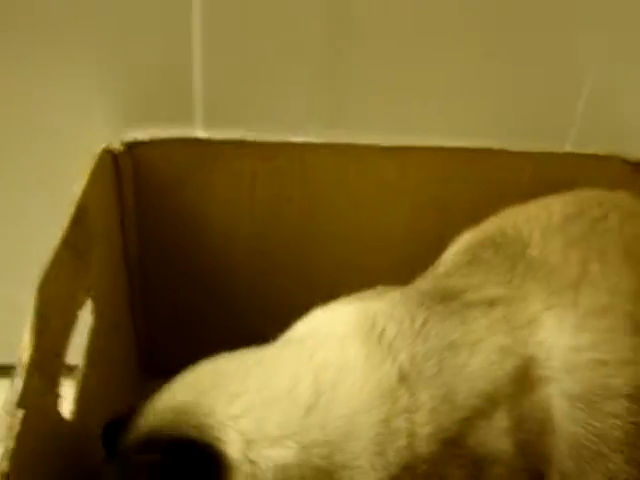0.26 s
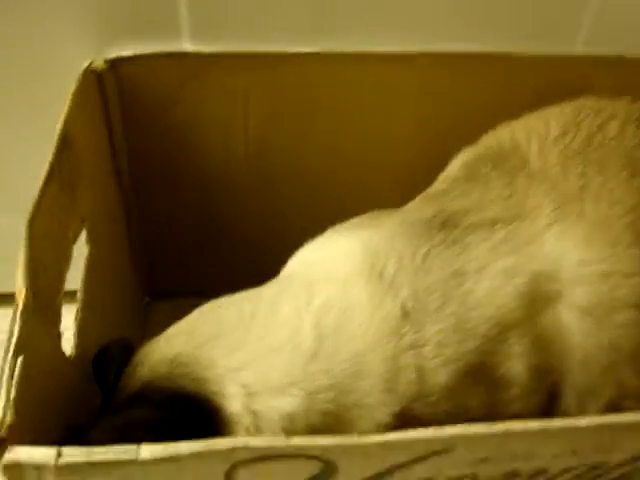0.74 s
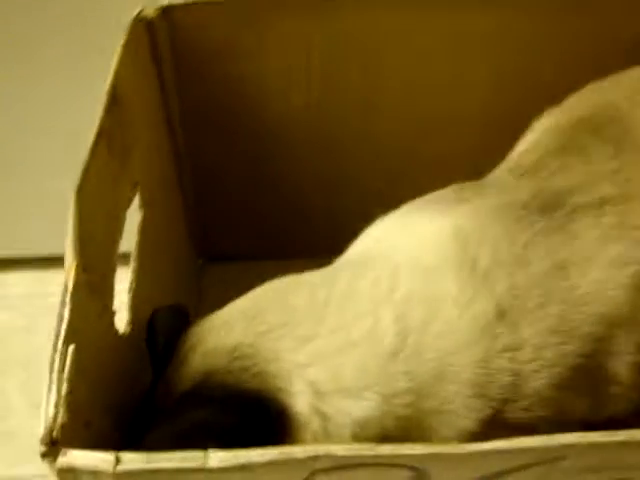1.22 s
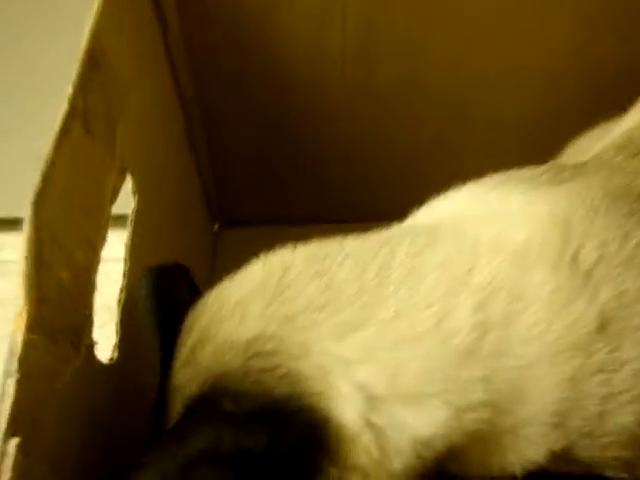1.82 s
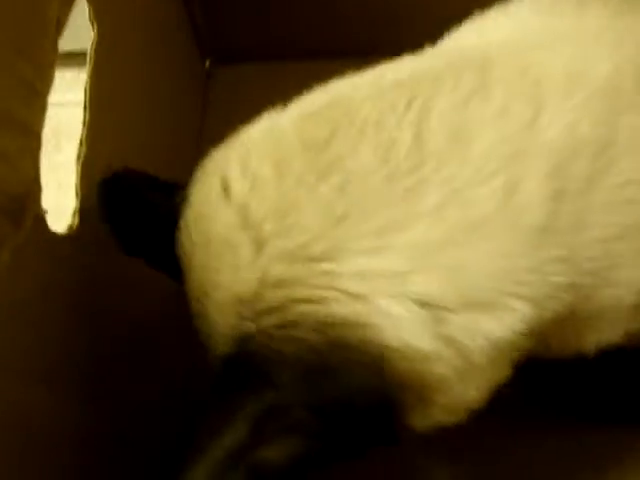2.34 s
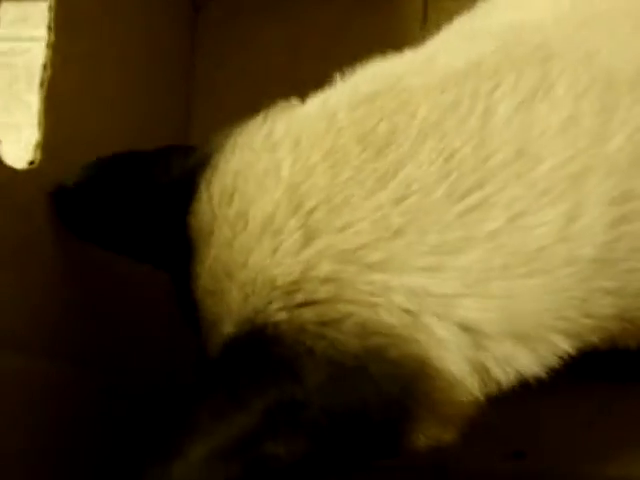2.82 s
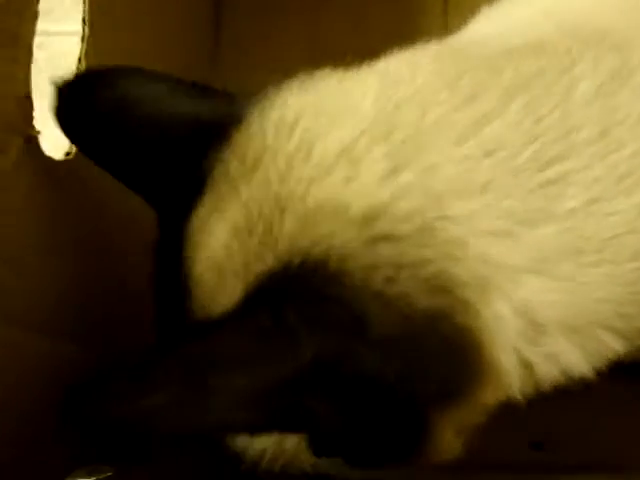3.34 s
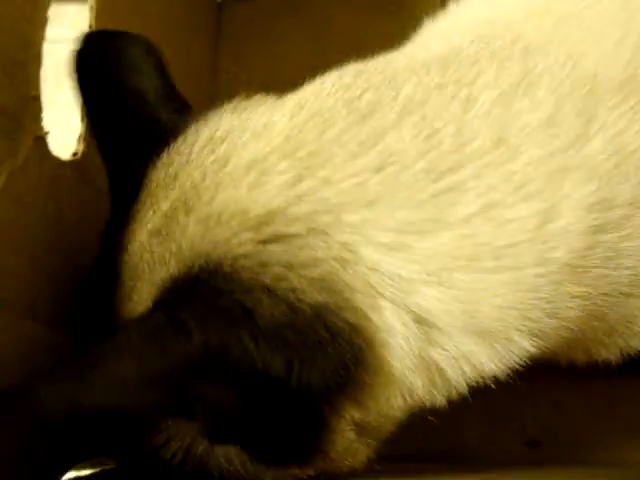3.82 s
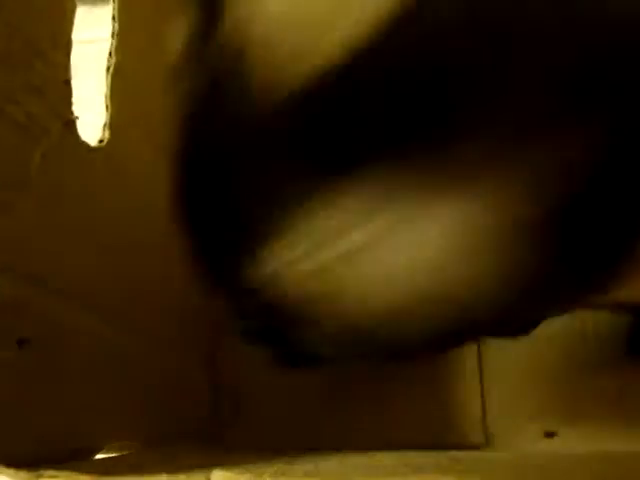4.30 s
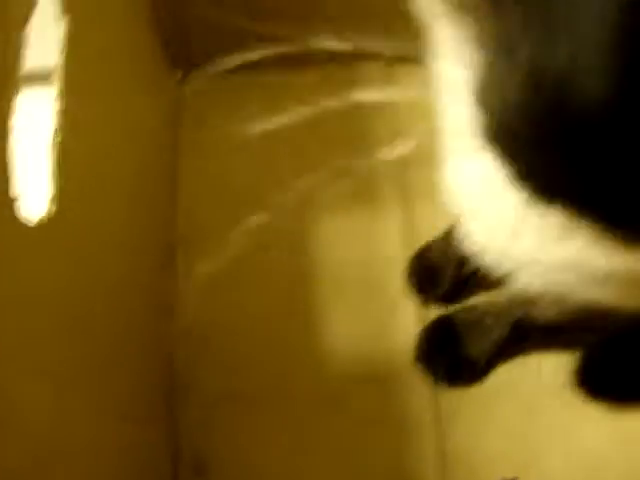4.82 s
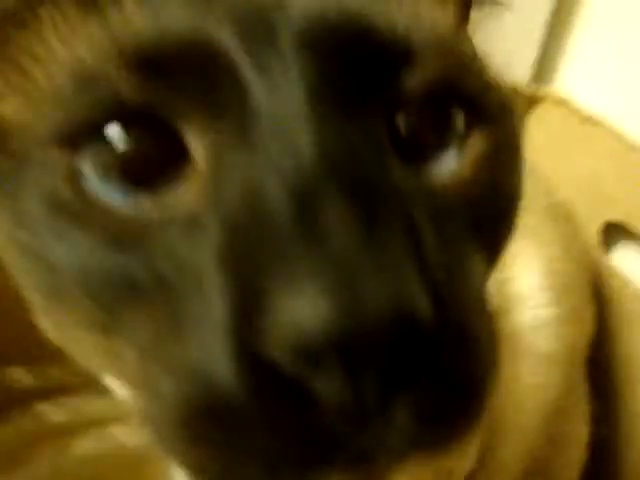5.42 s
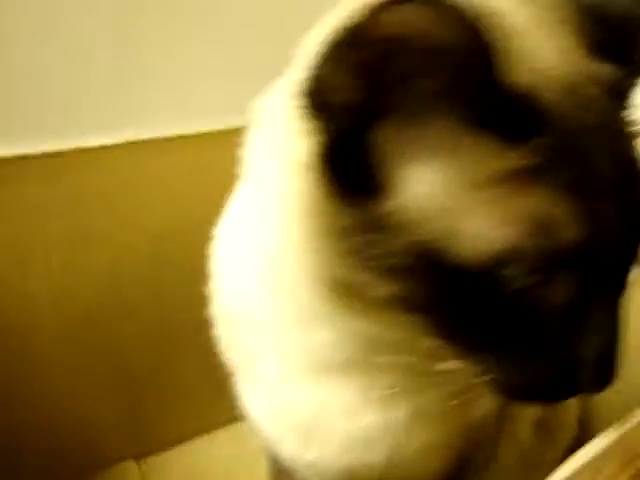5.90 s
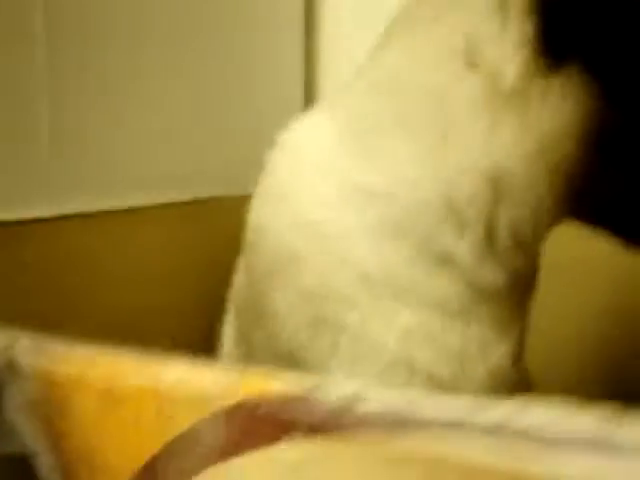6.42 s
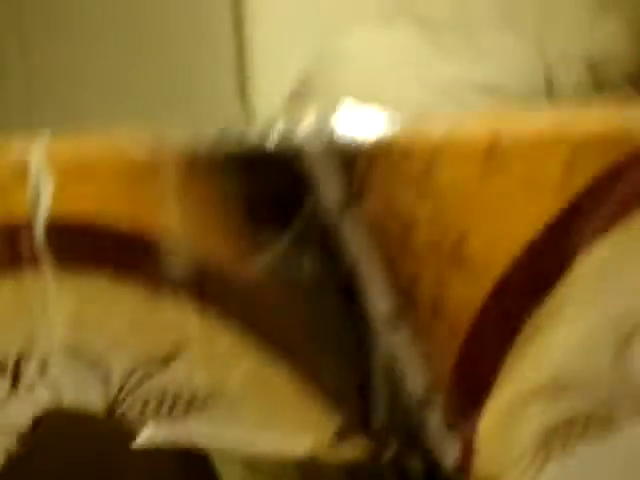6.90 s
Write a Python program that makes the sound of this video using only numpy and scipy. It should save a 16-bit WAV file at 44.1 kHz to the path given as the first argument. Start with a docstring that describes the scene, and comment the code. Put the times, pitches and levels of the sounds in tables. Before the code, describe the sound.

A fan motor hums faintly in a room while a cat claws at a cardboard box in quick, uneven strokes, with dry tearing, snaps and hollow bumps close to the microphone. The cat scratches for about three seconds, pauses, then digs again briefly. Near the end come irregular plastic clicks from the hand-held camera, the hardest with a low knock, and a light rub of fingers.

```python
"""A cat rakes the floor of a cardboard box, close to a small hand-held camera; a fan motor hums throughout.
0.15 s: the camera's plastic shell ticks once. 0.2-3 s: claws catch, slip, snag and squeak on the fibres and
ring the box. 3.5-4.3 s: a second bout of digging, in which the box's low rocking sounds louder. From 5.2 s: the
shell ticks, the hardest ticks knock against the hand, and from 6 s fingers rub the plastic."""
import sys
import numpy as np
from scipy import signal
from scipy.fft import rfft, irfft
from scipy.io import wavfile
from scipy.ndimage import uniform_filter1d

SR = 44100
rng = np.random.default_rng(int(sys.argv[2]) if len(sys.argv) > 2 else 0)


def transcribe(u):
    """Save the signal u as a 16-bit wav file named by the first command-line argument.

    u: samples, shape (n,) or (channels, n), limited to [-1, 1]; the rate is SR.
    q: integer samples, one column per channel.
    """
    v = np.clip(np.atleast_2d(u).T, -1, 1)
    q = np.round(v * 32767).astype(np.int16)
    wavfile.write(sys.argv[1], SR, q)


N = 315437

# claw strokes: peak_s, rise_ms, fall_ms, force_db, weight_re_force_db, tear_re_force_db
STROKES = [(0.233, 2.8, 9.3, -25.5, 5, -23), (0.323, 13, 8.8, -32, -3.5, -8), (0.391, 3.7, 14, -38, -10, 3),
           (0.409, 9.5, 2.8, -30, -3, -5), (0.502, 23, 6.8, -38, 6, 4.5), (0.523, 9.5, 14, -28, 1, -10),
           (0.62, 2.6, 7.5, -30.5, 2.5, -3.5), (0.67, 27, 20, -33.5, -6, -12),
           (0.811, 51, 8, -33, -8.5, -7), (0.892, 18, 17, -46, 8.5, 3), (0.954, 13.4, 7.4, -22, 0.5, -10),
           (0.964, 12, 15, -21.5, -5.5, -44), (1.044, 53, 2.6, -38, 1, -12), (1.078, 3.7, 9, -34, 8, 2.5),
           (1.142, 36, 15, -36.5, 0.5, -7.5), (1.256, 25, 13, -41, -25, 2.5),
           (1.307, 26, 110, -48, 0.5, -5.5), (1.385, 4.5, 4.6, -35, -14, -26),
           (1.406, 27.7, 7.9, -21.5, -1.5, -9), (1.424, 7.2, 13, -46.5, 16, -24),
           (1.461, 17, 48, -36, 4, -6), (1.531, 7.6, 31, -35, -4, -9), (1.648, 24, 5, -32, -9, -5.5),
           (1.758, 71, 36, -41, -3.5, -6.5), (1.841, 16, 10, -34, 9.5, -17),
           (1.856, 13, 16, -26.5, 0.5, -6.5), (1.973, 52, 23, -26.5, -1, -13),
           (2.098, 9.3, 12, -35.5, -25, -6), (2.244, 19, 12, -38.5, -6, -11.5),
           (2.27, 10, 4.9, -36.5, -8, -11), (2.324, 6.2, 24, -33, -13, -23),
           (2.36, 7.3, 14, -31.5, -3, -12), (2.385, 17, 22, -20.5, -9.5, -15.5),
           (2.418, 16, 12.4, -25, -13, -13), (2.498, 18, 3.9, -27, -10, -14),
           (2.628, 15, 57, -28, -14, -15), (2.702, 28, 60, -25, -11, -15),
           (2.731, 9.1, 20, -25, -10.5, -7.5), (2.837, 36, 66, -35, -23, -11),
           (3.009, 13, 40, -40, -9, -6.5), (3.484, 5.5, 19, -29.5, -2, -3), (3.533, 5.4, 3, -15, -11.5, -7),
           (3.6, 14, 52, -48, -17, 3), (3.65, 17, 13, -35, -11, -2.5), (3.666, 12, 9.7, -37, 4, -16),
           (3.685, 18, 20, -46, 5, 1), (3.716, 6.4, 12, -24, 2, -5.5), (3.735, 8, 8.6, -41, 15, -26),
           (3.8, 1.5, 14, -31, -2.5, -2.5), (3.825, 9, 1.8, -28, 0, 0.5),
           (3.844, 5.6, 2.7, -31.5, 4.5, -22), (3.883, 18, 9.3, -42.5, 7, 1),
           (3.906, 14.6, 12, -32, -5.5, -6.5), (4.027, 34, 8.8, -40, -2, -4.5),
           (4.061, 13, 64, -40.5, 2.5, -6), (4.154, 9.6, 11, -28.5, -7, -4), (4.178, 11, 16, -35.5, -2, -5),
           (4.23, 69, 2.2, -43.5, 4, -2)]
# soft paw drag: time_s, level_db, grit_re_level_db
PAW_DRAG = [(0.15, -79, -12), (0.27, -42, -20), (0.54, -36.5, -15), (0.72, -49.5, -8.5), (0.86, -38, -18),
            (1.0, -46.5, -24), (1.3, -37.5, -11.5), (1.65, -54.5, -13), (1.9, -45, -8.5),
            (2.17, -45.5, -12.5), (2.45, -42.5, -13.5), (2.58, -44, -15), (3.01, -55.5, -7.5),
            (3.42, -76, -25), (3.54, -41.5, -16), (3.72, -37, -9), (3.87, -44, -20), (3.97, -60, -17),
            (4.05, -46.5, -9.5), (4.23, -48, -7), (4.3, -63, -15), (4.45, -72, -15)]
# a claw hooks and snaps free: start_s, level_db, knock_re_level_db
SNAGS = [(0.23, -23.5, 7.5), (0.313, -31, -4), (0.496, -21, -11), (0.52, -22, -7), (0.618, -26.5, 8),
         (0.655, -30, 2), (0.948, -36, 10), (0.962, -24, 7), (1.077, -21.5, -7.5), (1.125, -23.5, 7),
         (1.162, -32, -6), (1.384, -29, 14), (1.401, -19, 1), (1.528, -29, 14), (1.651, -36, 6),
         (1.831, -26, 5), (1.949, -27, -3), (1.965, -29, 10), (2.322, -31, -3), (2.378, -19.5, 0),
         (2.395, -28, -3), (2.626, -23.5, -18), (2.726, -15, -4), (3.478, -30.5, 18), (3.531, -20, 10),
         (3.577, -37, 1), (3.713, -30, 2), (3.726, -29, 12), (3.805, -33, 15), (3.842, -22.5, 6),
         (3.88, -29, -5), (3.902, -24, 12), (3.97, -35.5, 2), (4.149, -33.5, 18.5), (4.226, -34, -6)]
# claw tip squeaks: start_s, pitch_hz, peak_db
SQUEAKS = [(0.778, 2800, -27.5), (0.952, 3600, -24.5), (1.159, 4640, -31.5), (1.833, 4000, -35),
           (1.854, 3860, -27), (1.937, 5500, -38), (3.478, 1650, -26.5), (3.501, 2350, -39)]
# box resonances: centre_hz, width_hz, relative_db
WALL_MODES = [(251.5, 54, 1), (343, 46, 3.5), (463, 59.5, 2), (575, 61, 7.5), (613.6, 77, 7.5),
              (652, 120, 4)]
ROCKING_MODES = [(106, 12, -1), (135, 15, -11.5), (182, 41, -2), (273, 18, 0)]
FLOOR_MODES = [(880, 124, 6.5), (973, 365, -0.5), (1333, 330, 0.5), (1557, 280, -2.5), (2010, 154, -7.5)]
OPEN_FLOOR_MODES = [(1002, 60, 1.5), (1056, 76, 1.5), (1154, 135, -10)]
TEAR_MODES = [(1813, 260, 2), (2350, 650, -1), (3074, 1200, -2), (3910, 640, 0), (4560, 590, -4.5),
              (5360, 570, -4), (6380, 1100, -5.5), (7690, 940, -6), (9020, 1500, -9)]
GRIT_MODES = [(2070, 560, -0.5), (2800, 1330, 1.5), (3950, 1500, -1.5), (5300, 960, -6),
              (7600, 2500, -11.5)]  # loose fibres under the paw
# narrow ring, stronger with the paw on the open floor: time_s, gain_db
OPEN_FLOOR_GAIN = [(0.2, -18), (0.9, -27), (1.1, -5.5), (1.4, -1.5), (1.7, 1), (2.0, -2.5), (2.3, -8.5),
                   (2.55, 0), (2.7, -21), (2.9, -8.5), (3.48, -12), (3.6, -4), (3.67, 10), (3.72, -9),
                   (3.75, 6), (3.82, -6), (3.9, 2), (4.05, 4.5), (4.22, 3)]

# shell ticks: start_s, mid_db, low_re_mid_db, body_re_mid_db, high_re_mid_db, decay_ms
SHELL_TICKS = [(0.1543, -26, -25, -24, -8.5, 2.9), (5.2302, -30, -7, -22, -25, 2.3),
               (5.455, -12.5, -14, -12, -28, 7.5), (5.52, -28, -12, -20, -25, 2.5),
               (5.919, -36, -18, -20, -22, 2.5), (5.967, -29, -19, -19, -24, 2.3),
               (6.0998, -29.5, 1, 11.5, -35, 6.7), (6.4385, -9.5, -1, -19, -13.5, 4.6),
               (6.559, -17.5, -1, -26, -2.5, 4.3), (6.6278, -26.5, 13.5, 9.5, -12, 2.3),
               (6.7352, -12.5, -2.5, -23, -11, 1.8), (6.7381, -4, -6, -7.5, -18, 2.4),
               (6.7634, -31, -4, -17, -20, 3)]
# fingers sliding on the shell: peak_s, rise_ms, fall_ms, level_db, treble_db
FINGER_RUBS = [(0.185, 10, 12, -56, -64), (6.0, 34, 31, -50, -66), (6.88, 31, 34, -58.5, -62),
               (7.08, 98, 110, -56, -57.5)]
# shell resonances: centre_hz, width_hz, relative_db
SHELL_LOW_MODES = [(1000, 110, 7.5), (1510, 500, 11.5), (1240, 630, 7), (475, 420, 1)]
SHELL_BODY_MODES = [(2070, 390, 0)]
SHELL_MID_MODES = [(2630, 380, 16), (3100, 400, -27), (2350, 230, 9.5)]
SHELL_HIGH_MODES = [(3700, 700, -2), (4600, 900, 0), (6000, 2000, -5), (8300, 2500, -7)]

# fan rush spectrum: frequency_hz, relative_density_db
FAN_SPECTRUM = [(20, -54), (45, -39), (100, -23.5), (170, -7.5), (260, -7.5), (330, -11), (450, -9),
                (650, -6), (950, -8), (1400, -15.5), (2500, -20.5), (5000, -26), (10300, -31)]
# resonances in the rush: centre_hz, width_hz, relative_db
FAN_MODES = [(414, 82, -6.5), (962, 74, -11), (3370, 26, -19), (4320, 85, -37)]
# mains and motor lines: pitch_hz, level_db
HUM_LINES = [(50, -75.5), (57, -76), (121, -83.5), (138, -92), (210, -54.5), (240, -65.5), (291, -66.5)]


def claws():
    """Stick-slip on cardboard: coarse catches shake the panels, dense tearing rasps."""
    walls, floor, rasp, rocking = stroke_pressures()
    drag_db, grit_re_drag_db = curves(PAW_DRAG)
    grit_db = drag_db + grit_re_drag_db
    drag_db = drag_db + 2 * walk(rate_hz=29.36)
    grit_db = grit_db + 2 * walk(rate_hz=29.36)
    catches, tearing = fibre_friction()
    grit = undb(grit_db + 3 * walk(rate_hz=60)) * (.8 * tearing + .6 * slips(per_s=500, spread_db=3))
    hook, knock, snap = snags()
    wall_force = (walls + undb(drag_db - 3)) * catches
    floor_pressure = floor + undb(drag_db)
    floor_force = floor_pressure * (.35 * catches + .48 * tearing) + hook
    open_floor_force = undb(curves(OPEN_FLOOR_GAIN)[0]) * (.5 * floor_pressure * catches + hook)
    # the moving paw favours each mode in turn
    out = ring(wall_force, WALL_MODES, wander_db=2, rate_hz=20)
    out += ring(knock, WALL_MODES, order=1)
    out += ring(rocking * catches, ROCKING_MODES)
    out += ring(floor_force, FLOOR_MODES, wander_db=2.2, rate_hz=28)
    out += ring(open_floor_force, OPEN_FLOOR_MODES, wander_db=4, rate_hz=22)
    out += ring(rasp * tearing + snap, TEAR_MODES, wander_db=3, rate_hz=70)
    return out + ring(grit, GRIT_MODES, wander_db=3, rate_hz=50)


def stroke_pressures(second_bout_s=3.3, second_bout_db=3.5):
    """Wall, floor, rasp and rocking envelopes; hard, heavy strokes rock the box more."""
    rows = []
    for peak_s, rise_ms, fall_ms, force_db, weight_db, tear_db in STROKES:
        rocking_db = -25.5 + .81 * force_db + .52 * weight_db + second_bout_db * (peak_s > second_bout_s)
        rows.append((peak_s, rise_ms, fall_ms, force_db + weight_db, force_db, force_db + tear_db,
                     rocking_db))
    return pressure(rows, sharpness=2.73)


def fibre_friction(crackle_share=.36):
    """Catching and tearing judder as claws skip over the flutes; single fibres crack."""
    judder = level(undb(2.1 * walk(rate_hz=130)), 0)
    catches = slips(per_s=2500, spread_db=0) * judder
    tearing = slips(per_s=6000, spread_db=-1.07) * judder
    crackle = level(slips(per_s=900, spread_db=2.5) * undb(3 * walk(rate_hz=45)), 0)
    return catches, np.sqrt(1 - crackle_share) * tearing + np.sqrt(crackle_share) * crackle


def snags(hook_decay_s=.0019, snap_decay_s=.0024):
    """A claw hooks the floor, knocks the walls and snaps free."""
    hook, knock, snap = np.zeros((3, N))
    t = np.arange(600) / SR
    for start_s, db, knock_db in SNAGS:
        part = span(start_s, t)
        jolt = rng.standard_normal(len(t))
        blow = .6 * jolt * np.exp(-t / hook_decay_s) + 6 * (t == 0)
        hook[part] += undb(db) * blow
        knock[part] += undb(db + knock_db) * blow
        snap[part] += undb(db - 10) * jolt * np.exp(-t / snap_decay_s)
    return hook, knock, snap


def squeaks(rise_s=.00085, decay_s=.0036):
    """A catching claw tip gives a brief damped tone."""
    out = np.zeros(N)
    t = np.arange(600) / SR
    envelope = np.minimum(t / rise_s, 1) * np.exp(-t / decay_s)
    for start_s, pitch_hz, db in SQUEAKS:
        out[span(start_s, t)] += undb(db) * envelope * np.sin(2 * np.pi * pitch_hz * t)
    return out


def box_hollow(x, rt60_s=.28):
    """The cavity adds a short, dull tail."""
    t = np.arange(int(.2 * SR)) / SR
    tail = rng.standard_normal(len(t)) * undb(-60 * t / rt60_s)
    wet = signal.fftconvolve(x, tail / np.sqrt(np.sum(tail ** 2)))[:N]
    return x + undb(-10) * signal.lfilter([.45], [1, -.55], wet)


def camera_shell(knock_hz=110.6, knock_width_hz=45, knock_db_per_db=3.2):
    """Bursts of cracks and finger rubs ring the plastic; the hand's knock follows each tick."""
    low, body, mid, high, knock = np.zeros((5, N))
    t = np.arange(500) / SR
    click = .8 * np.exp(-((t - .001) / .00005) ** 2)
    for start_s, db, low_db, body_db, high_db, decay_ms in SHELL_TICKS:
        crack = click + .15 * rng.standard_normal(len(t)) * np.exp(-t * 1000 / decay_ms)
        part = span(start_s, t)
        mid[part] += undb(db) * crack
        low[part] += undb(db + low_db) * crack
        body[part] += undb(db + body_db) * crack
        high[part] += undb(db + high_db) * crack
        knock[part.stop] += undb(4 + knock_db_per_db * db)
    rub, rub_treble = pressure(FINGER_RUBS, sharpness=4.1) * slips(per_s=4000, spread_db=1)
    out = ring(low + rub, SHELL_LOW_MODES) + ring(body + .5 * rub, SHELL_BODY_MODES)
    out += ring(mid + rub, SHELL_MID_MODES) + ring(high + rub_treble, SHELL_HIGH_MODES)
    return out + ring(knock, [(knock_hz, knock_width_hz, 0)])


def fan_rush(rush_db=-49, modes_db=-54.5):
    """Air noise in slightly flickering half-octave bands, plus narrow resonances."""
    hz, density_db = np.transpose(FAN_SPECTRUM)
    bin_hz = np.maximum(np.fft.rfftfreq(N, 1 / SR), 1)
    spectrum = rfft(rng.standard_normal(N)) * undb(np.interp(np.log(bin_hz), np.log(hz), density_db))
    rush = np.zeros(N)
    for centre_octave in np.arange(4, 14, .5):
        band = np.clip(1 - np.abs(np.log2(bin_hz) - centre_octave) / .5, 0, 1)
        rush += irfft(spectrum * band, N) * undb(.5 * walk(rate_hz=6))
    return level(rush, rush_db) + level(ring(rng.standard_normal(N), FAN_MODES), modes_db)


def motor_hum(pitch_spread=.00552, waver_db=2.4):
    """Mains and motor lines drift together in pitch and waver singly in level."""
    warped_s = np.cumsum(1 + pitch_spread * walk(rate_hz=7.3)) / SR
    out = np.zeros(N)
    for pitch_hz, db in HUM_LINES:
        amplitude = np.sqrt(2) * undb(db + waver_db * walk(rate_hz=14))
        out += amplitude * np.sin(2 * np.pi * pitch_hz * warped_s)
    return out


def pressure(strokes, sharpness):
    """Contact envelopes, one per level column; overlapping strokes add in power."""
    power = np.zeros((len(strokes[0]) - 3, N))
    for peak_s, rise_ms, fall_ms, *levels_db in strokes:
        i = np.arange(max(int((peak_s - .25) * SR), 0), min(int((peak_s + .35) * SR), N))
        offset_ms = (i / SR - peak_s) * 1000
        width_ms = np.where(offset_ms < 0, rise_ms, fall_ms)
        shape = np.exp(-np.abs(offset_ms / width_ms) ** sharpness)
        power[:, i] += np.outer(undb(levels_db), shape) ** 2
    return np.sqrt(power)


def slips(per_s, spread_db):
    """Stick-slip force: clicks of random time and size, rms 1."""
    slipping = rng.random(N) < per_s / SR
    size = np.minimum(rng.exponential(size=N), 6)
    return level(slipping * undb(spread_db * size) * rng.standard_normal(N), 0)


def ring(x, modes, wander_db=0, rate_hz=12, order=2):
    """Parallel resonances near unit noise gain; each level may wander by itself."""
    impulse = np.arange(4096) == 0
    out = power = 0
    for k, (hz, width_hz, db) in enumerate(modes):
        section = np.concatenate(signal.iirpeak(hz, hz / width_hz / 1.5, SR))
        sos = np.tile(section, (order, 1))
        wander = level(undb(wander_db * walk(rate_hz)), 0) if wander_db else 1
        out += (-1) ** k * undb(db) * wander * signal.sosfilt(sos, x)
        power += np.sum((undb(db) * signal.sosfilt(sos, impulse)) ** 2)
    return out / np.sqrt(power)


def walk(rate_hz):
    """Random steps, smoothed twice; spread near 1."""
    hold = int(SR / rate_hz)
    steps = np.repeat(rng.standard_normal(N // 100), hold)[:N]
    return 1.28 * uniform_filter1d(uniform_filter1d(steps, hold), hold)


def curves(table):
    """Per-sample curves through breakpoints, one per column after time_s."""
    time_s, *columns = np.transpose(table)
    return [np.interp(np.arange(N) / SR, time_s, column) for column in columns]


def span(start_s, t):
    """Slice of len(t) samples from start_s."""
    return slice(int(start_s * SR), int(start_s * SR) + len(t))


def level(x, rms_db):
    """Scale to an rms level."""
    return x * undb(rms_db) / np.sqrt(np.mean(x ** 2))


def undb(db):
    """dB to gain."""
    return 10 ** (np.asarray(db) / 20)


def scene():
    """Box, camera shell and fan at one microphone."""
    return (box_hollow(claws() + squeaks()) + camera_shell() + fan_rush() + motor_hum())[None]


def record(dry):
    """The small microphone drops the deep bass; the camera cuts the top steeply."""
    bass_hz, top_hz = 60, 10000
    thin = signal.sosfilt(signal.butter(2, bass_hz, "high", fs=SR, output="sos"), dry)
    return signal.sosfilt(signal.ellip(10, .2, 60, top_hz, fs=SR, output="sos"), thin)


dry = scene()
out = record(dry)
transcribe(out)
```